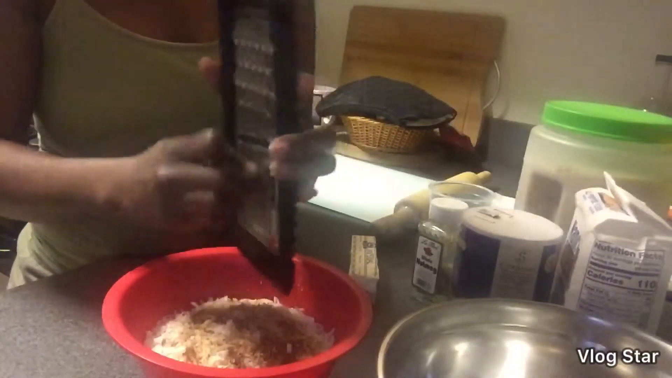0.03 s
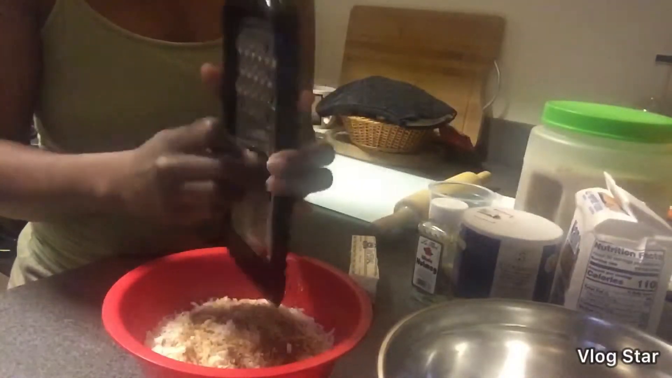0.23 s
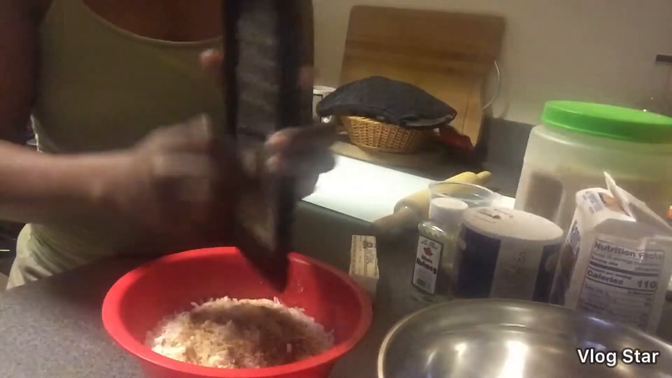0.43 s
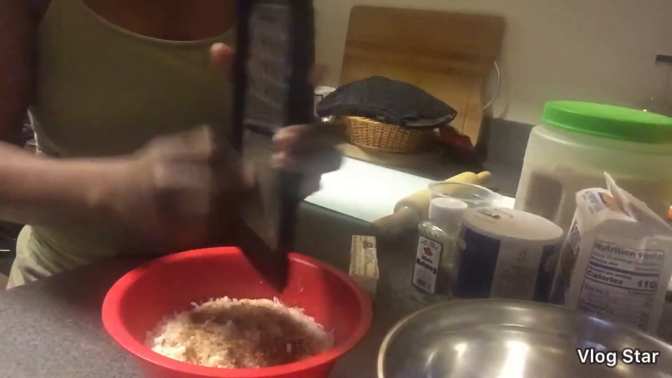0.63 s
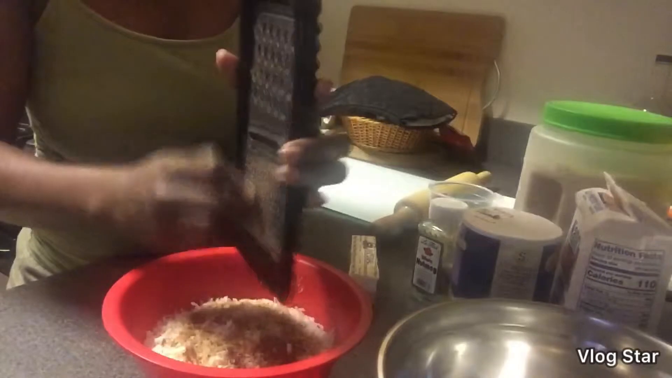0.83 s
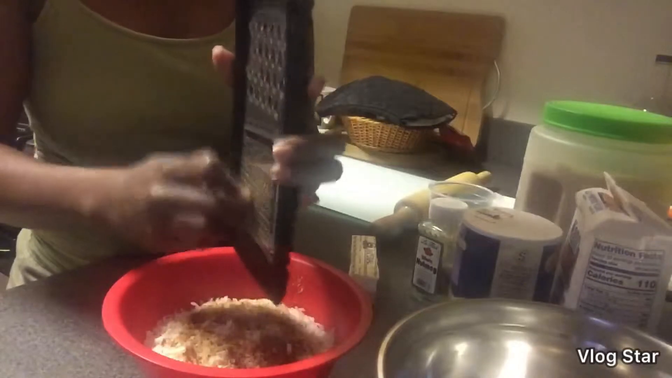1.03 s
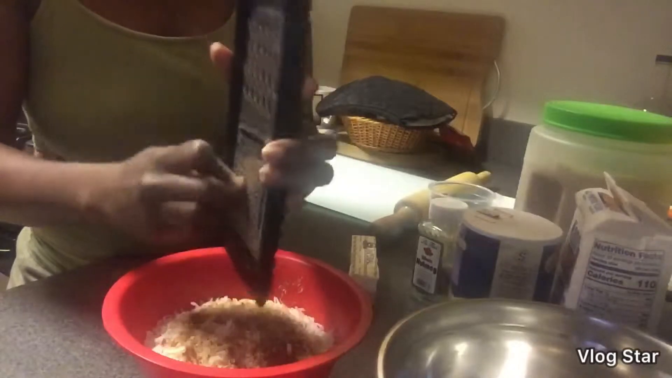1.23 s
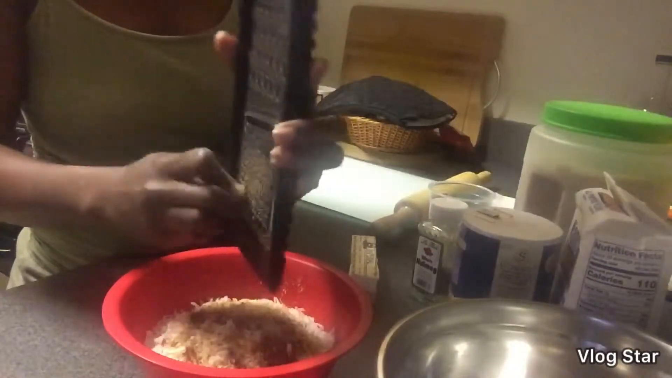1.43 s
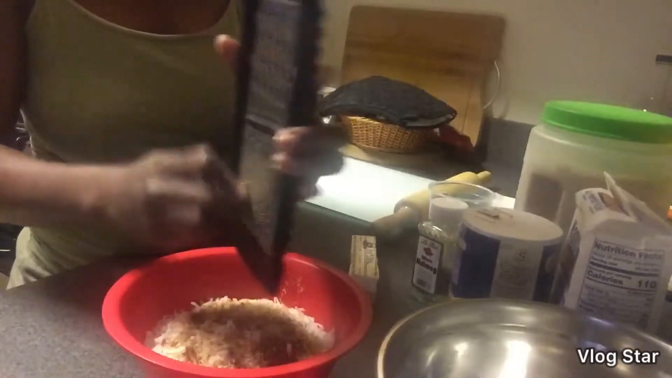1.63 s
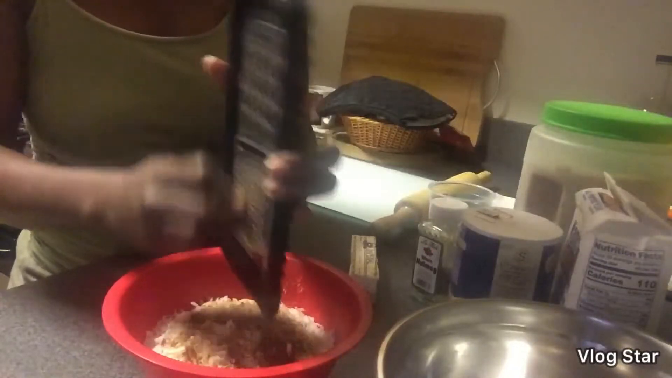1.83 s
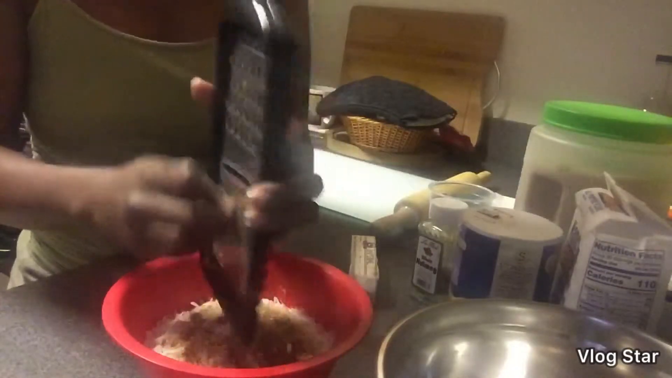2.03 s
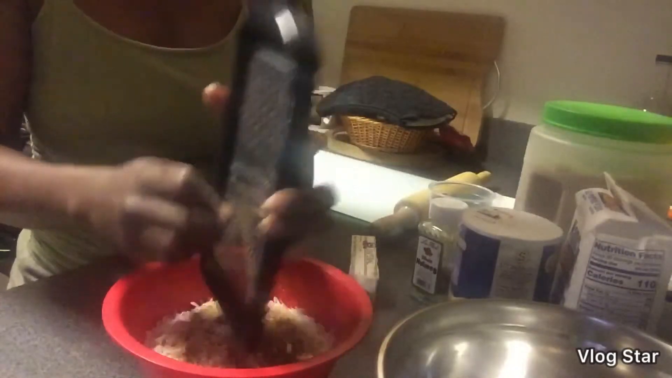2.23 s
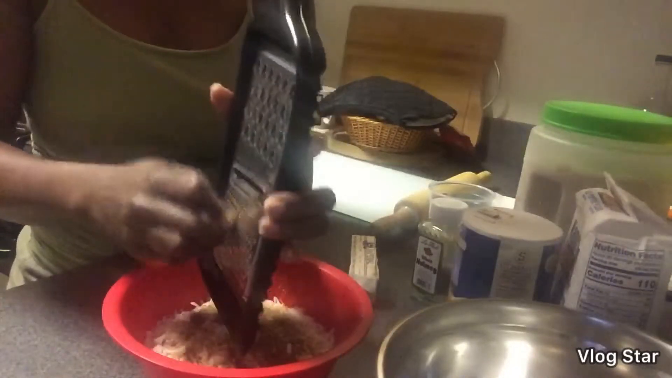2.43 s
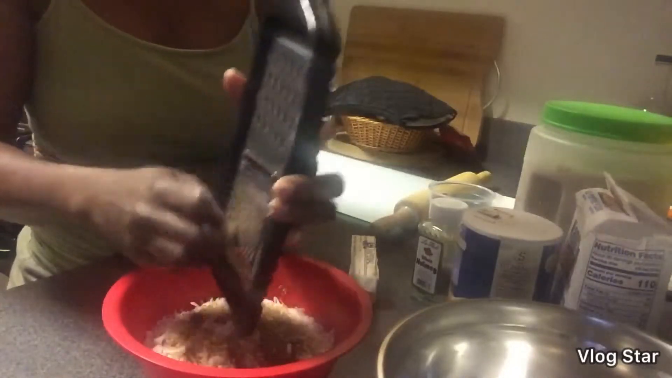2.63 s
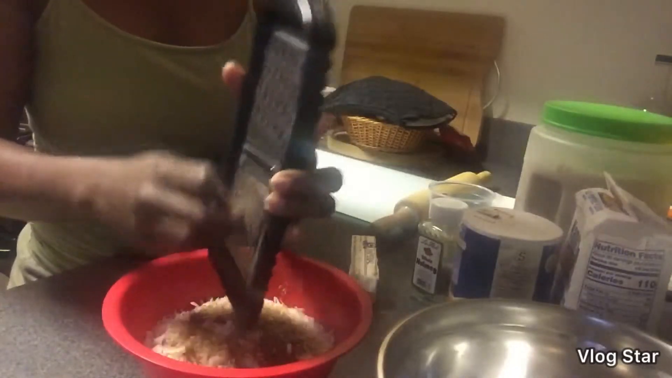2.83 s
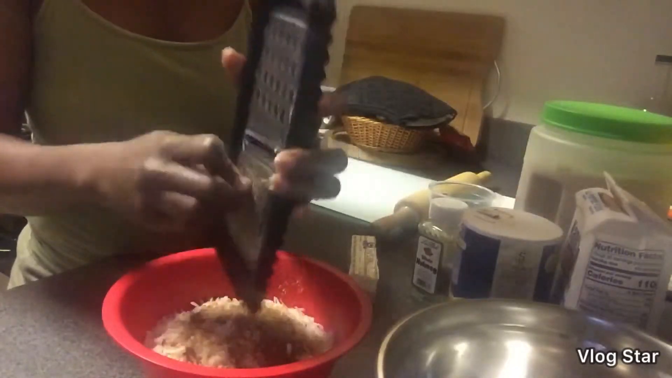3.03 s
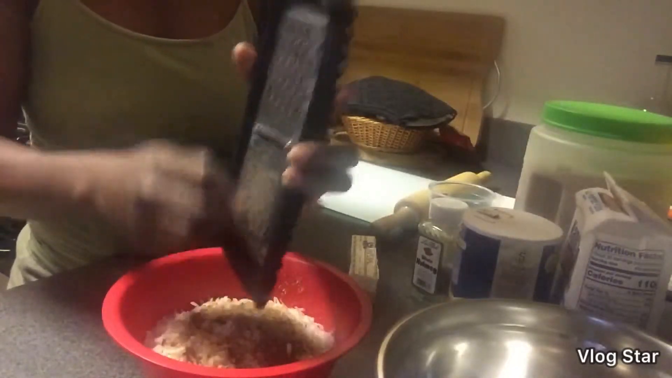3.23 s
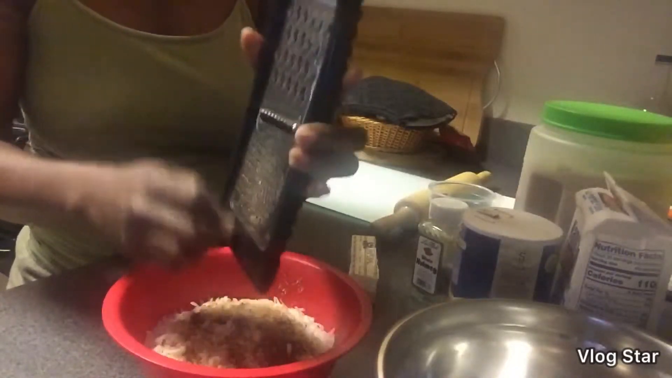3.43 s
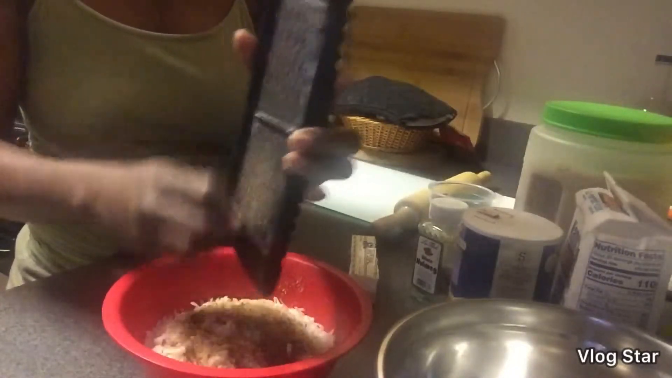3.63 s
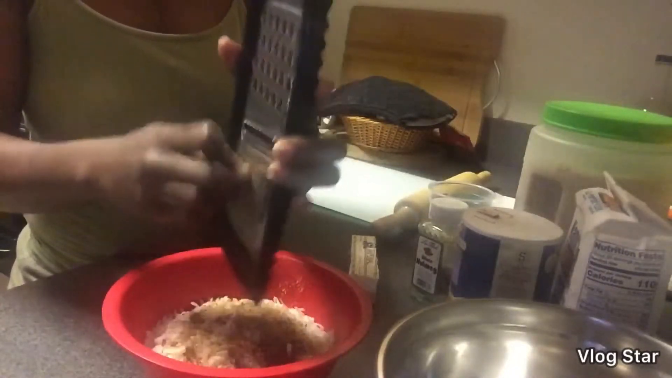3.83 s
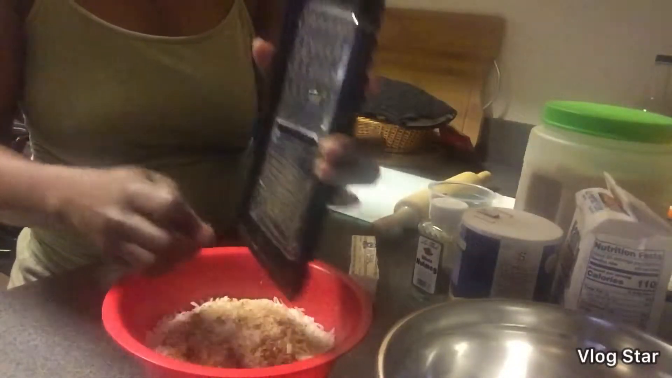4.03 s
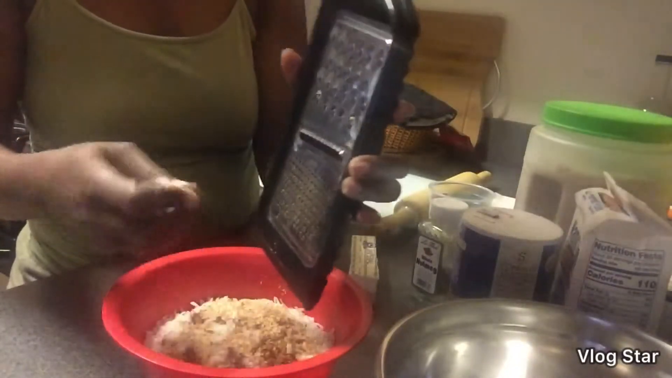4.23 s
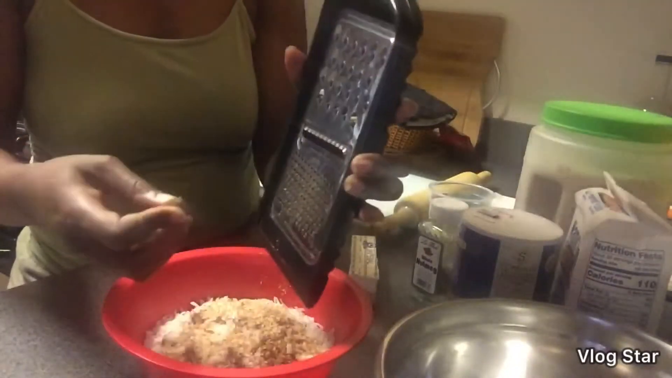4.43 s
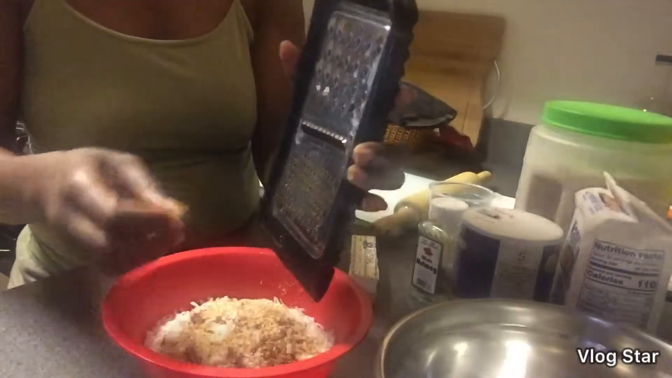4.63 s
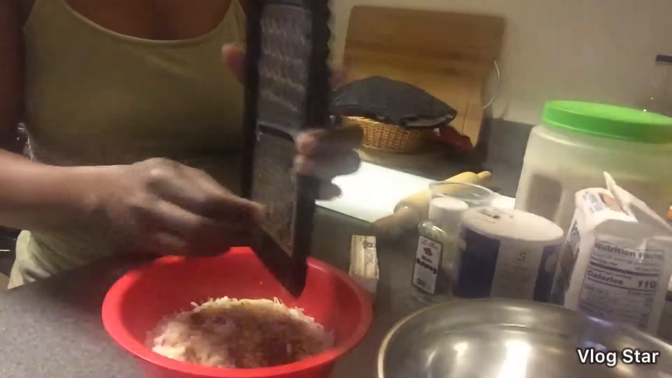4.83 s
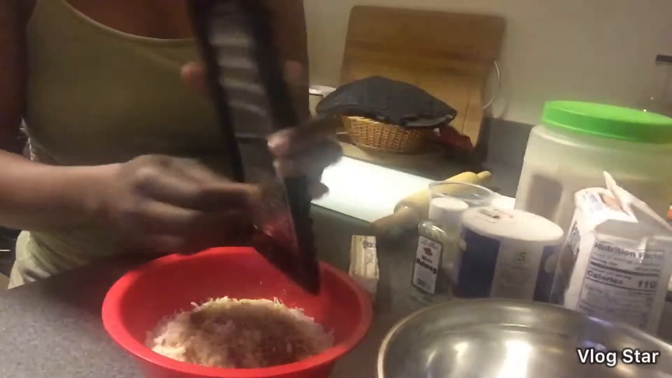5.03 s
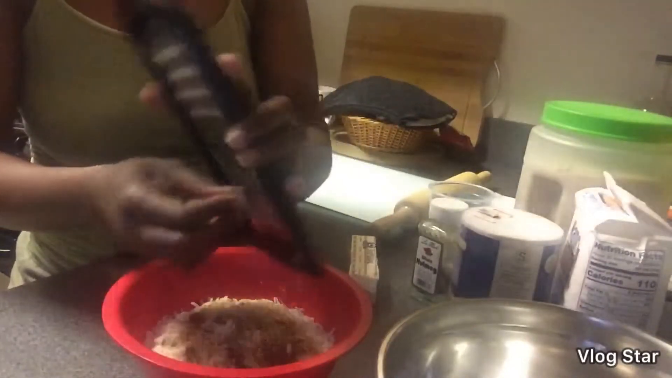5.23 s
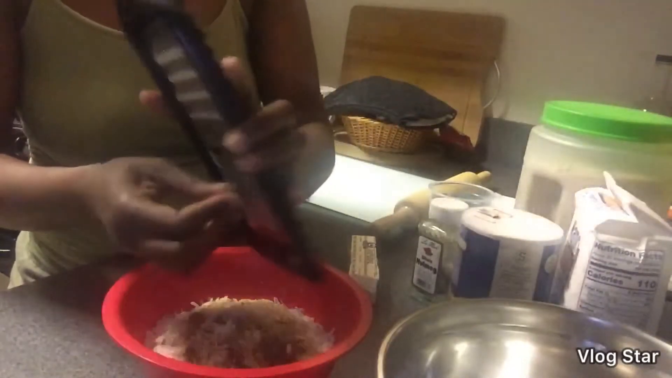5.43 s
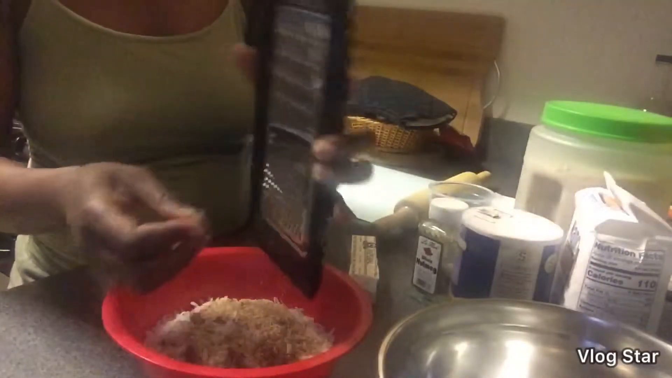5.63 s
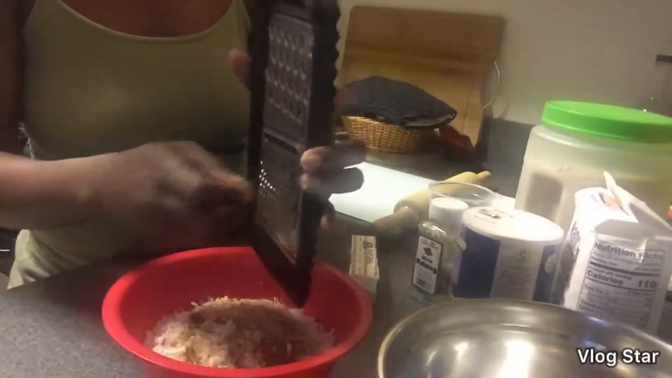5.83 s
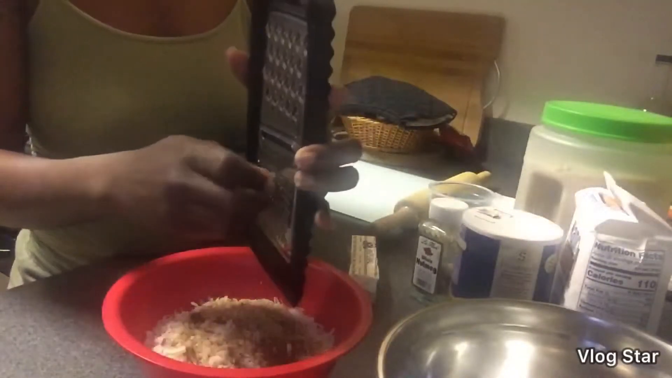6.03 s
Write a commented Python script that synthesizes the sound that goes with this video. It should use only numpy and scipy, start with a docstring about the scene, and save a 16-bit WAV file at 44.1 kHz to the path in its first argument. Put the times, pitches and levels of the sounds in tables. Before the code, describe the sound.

A whole nutmeg rasps in quick strokes over a hand-held steel grater, clacking on the plate, then four sharp taps in a small kitchen.

```python
"""A whole nutmeg is rubbed over a hand-held steel grater above a bowl, about four strokes a second.
The teeth chip it in dense tiny fractures that ring the plate; the nut clacks where it lands and where it catches.
After a pause four sharp taps knock the powder off, each with a thud of the frame.
The place is a small kitchen: short reflections, faint rumble and hiss, and a low, wavering appliance hum.
The grater is near the phone's microphone, so its direct sound outweighs the room."""
import sys
import numpy as np
from scipy import signal
from scipy.fft import rfft, irfft, next_fast_len
from scipy.io import wavfile
from scipy.ndimage import uniform_filter1d

SR = 44100
rng = np.random.default_rng(int(sys.argv[2]) if len(sys.argv) > 2 else 0)


def store_wav(level_fs):
    """Save 16-bit WAV to argv[1]."""
    pcm = np.round(np.clip(np.atleast_2d(level_fs), -1, 1) * 32767)
    wavfile.write(sys.argv[1], SR, pcm.T.astype(np.int16))


N = 269010
TIME = np.arange(N) / SR  # s
RING_TIME = TIME[:SR // 4]  # s, the length of one impact
TOP_HZ = 16000  # upper limit of the microphone and of the reflections


def undb(db):
    """Decibels to amplitude gain."""
    return 10 ** (np.asarray(db) / 20)


def unit(x):
    """Scale to an energy of one."""
    return x / np.sqrt(np.sum(x ** 2) + 1e-18)


def fade(t, t60):
    """Exponential decay of 60 dB in t60 seconds."""
    return np.exp(-np.log(1000) * t / t60)


def at(hz, table, axis=1):
    """Read a table's column on a log-frequency axis."""
    rows = np.array(table)
    return np.interp(np.log(np.maximum(hz, 1)), np.log(rows[:, 0]), rows[:, axis])


def colour(x, table):
    """Causal minimum-phase filter through (Hz, dB) points, made by folding the cepstrum."""
    size = 2 * next_fast_len(len(x))
    gain = undb(at(np.fft.rfftfreq(size, 1 / SR), table))
    cepstrum = irfft(np.log(gain))
    cepstrum[1:size // 2] *= 2
    cepstrum[size // 2 + 1:] = 0
    response = np.exp(rfft(cepstrum))
    return irfft(rfft(x, size) * response)[:len(x)]


def band(x, lo_hz, hi_hz, order=2):
    """Butterworth band-pass."""
    edges_hz = [lo_hz, min(hi_hz, SR / 2 - 100)]
    return signal.sosfilt(signal.butter(order, edges_hz, "band", fs=SR, output="sos"), x)


def shelf(x, hz, side, db):
    """Raise or lower the sound on one side ("low" or "high") of hz."""
    part = signal.sosfiltfilt(signal.butter(2, hz, side, fs=SR, output="sos"), x)
    return x + part * (undb(db) - 1)


def ring(x, response):
    """Play x through an impulse response."""
    return signal.fftconvolve(x, response)[:len(x)]


def walk(rate):
    """Random wander with a spread near one, through `rate` random points a second."""
    knots = rng.standard_normal(4096)
    return np.interp(TIME * rate, np.arange(len(knots)), knots)


def add(out, s, sound):
    """Mix a sound in at s seconds."""
    i = max(int(s * SR), 0)
    out[i:i + len(sound)] += sound[:N - i]


# Colour of the kitchen's air. Each row: frequency in Hz, relative level in dB.
AIR_COLOUR = [(20, -26), (55, -21.5), (140, -5.5), (200, -19), (400, -26.5), (1000, -32), (4000, -35),
              (12000, -43.5), (16000, -55)]
# Hum of an appliance. Each row: frequency in Hz, middle RMS level in dB, about which it wavers.
HUM_TONES = [(59, -74.5), (120, -78), (152, -71.5)]


def kitchen(air_db=-64.0, waver_db=8.0, phase_wander=.9):
    """Coloured noise gives soft rumble and hiss; sines wandering in level and phase (rad) give the hum."""
    noise = unit(colour(rng.standard_normal(N), AIR_COLOUR)) * np.sqrt(N)
    air = noise * undb(air_db + walk(3))
    hum = np.zeros(N)
    for hz, db in HUM_TONES:
        level = undb(db + waver_db * walk(4.5)) * np.sqrt(2)
        hum += level * np.sin(2 * np.pi * hz * TIME + phase_wander * walk(11.0))
    return air + hum


# Reverberation of the kitchen. Each row: frequency in Hz, decay time t60 in s, relative level in dB.
ROOM_DECAY = [(150, 1, -12.5), (600, 0.15, -8.5), (2540, 0.34, -13.5), (7000, 0.3, -13.5),
              (10000, 0.18, -13), (15000, 0.3, -16)]


def reflections(first_s=0.0072, count=10):
    """Diffuse response of walls and worktop: bands of noise, each dying away at its own rate."""
    t = TIME[:SR // 2]
    out = np.zeros(len(t))
    edges = np.geomspace(80, TOP_HZ, count + 1)
    for lo, hi in zip(edges, edges[1:]):
        hz = np.sqrt(lo * hi)
        noise = band(rng.standard_normal(len(t)), lo, hi, order=3)
        tail = noise * fade(t, at(hz, ROOM_DECAY)) * (t > first_s)
        bandwidth_gain = np.sqrt(2 * (hi - lo) / SR)
        out += unit(tail) * undb(at(hz, ROOM_DECAY, axis=2)) * bandwidth_gain
    return out


def room(sound, count=4, drift_hz=4):
    """The grater keeps moving, so the sound drifts between several patterns of reflections."""
    places = np.array([walk(drift_hz) for _ in range(count)])
    places /= np.sqrt(np.sum(places ** 2, axis=0))
    return sum(ring(sound * place, reflections()) for place in places)


# Modes of the grater. Each row: frequency in Hz, relative level in dB, decay time t60 in s.
GRATER_MODES = [(248, -27, .17), (434, -21, .09), (657, -26, .05), (1006, -28, .15), (1391, -21, .13),
                (1486, -24, .17), (1888, -13, .07), (2444, -13.5, .06), (2600, -11, .055),
                (2982, -14.5, .08), (3205, -12, .055), (3362, -8.5, .085), (3733, -16, .03),
                (3994, -25, .18), (4385, -24, .1), (5025, -16, .025), (6008, -23, .05), (7320, -14.5, .025),
                (8580, -22, .04), (11310, -24, .03)]


def clear_modes():
    """The free ring of each mode of the grater, a decaying sine, one row a mode."""
    rings = []
    for hz, db, t60 in GRATER_MODES:
        decaying_sine = np.sin(2 * np.pi * hz * RING_TIME) * fade(RING_TIME, t60)
        rings.append(undb(db) * unit(decaying_sine))
    return np.array(rings)


def dense(t60, count=7):
    """Countless overlapping modes: a noise burst that dies away, evened out in spectrum."""
    burst = rng.standard_normal(len(RING_TIME)) * fade(RING_TIME, t60)
    spectrum = rfft(burst)
    power = uniform_filter1d(np.abs(spectrum) ** 2, len(spectrum) // count ** 2)
    even = irfft(spectrum / np.sqrt(power), len(burst))
    return unit(even * fade(RING_TIME, 10 * t60))


def grater(modes, spectrum, t60, modes_db, scatter_db=1.5):
    """Response of the plate: a short clatter and its clear modes, whose mix depends on the spot that is hit."""
    signs = rng.choice([-1, 1], len(modes))
    weights = undb(scatter_db * rng.standard_normal(len(modes))) * signs
    clatter = colour(dense(t60), spectrum)
    return unit(clatter + undb(modes_db) * (weights @ modes))


def blow(hit, tilt, rebound_s, rebound, contact_s):
    """A contact builds up and rebounds at once; hardness and place tilt the colour by (Hz, dB) points."""
    hit = hit * (1 - np.exp(-RING_TIME / contact_s))
    again = np.interp(RING_TIME - rebound_s, RING_TIME, hit, left=0)
    return unit(colour(hit + rebound * again, tilt))


# Colour of the clatter of a tap. Each row: frequency in Hz, relative level in dB.
TAP_COLOUR = [(100, -30.5), (280, -11), (600, -6.5), (850, -18.5), (1200, -9.5), (2500, 2), (3400, -1),
              (5600, -1.5), (7400, -2.5), (9500, -10.5), (12000, -12.5), (16000, -22.5)]
# Taps that shake the powder off. Each row: start in seconds, relative level in dB, treble in dB,
# presence in dB, bass in dB, relative thud of the frame in dB, ring of the modes in dB, clatter t60 in s.
TAP_EVENTS = [(4.91, -15.5, 3, 4, -7.5, -48, -9.5, 0.035), (5.094, -16.5, -2.5, 4, -9, -46, -10, 0.022),
              (5.304, -20, -5.5, -3, -6.5, -38.5, -9, 0.051),
              (5.506, -17.5, -4.5, -2, -15, -43, -7.5, 0.058)]


def taps(modes, thud_hz=122, thud_t60=0.085):
    """Sharp taps ring the plate; the frame thuds in the hand, a decaying low sine."""
    out = np.zeros(N)
    thud = unit(np.sin(2 * np.pi * thud_hz * RING_TIME) * fade(RING_TIME, thud_t60))
    for s, db, treble_db, presence_db, bass_db, thud_db, ring_db, t60 in TAP_EVENTS:
        tilt = [(450, bass_db), (1400, 0), (3300, 0), (5000, presence_db), (10000, treble_db)]
        hit = grater(modes, TAP_COLOUR, t60=t60, modes_db=ring_db)
        tap = blow(hit, tilt, rebound_s=0.003, rebound=0.21, contact_s=.0007)
        add(out, s, undb(db + 22.5) * tap)
        add(out, s, undb(thud_db + 26.5) * thud)
    return out


# Colour of the clatter of a knock. Each row: frequency in Hz, relative level in dB.
KNOCK_COLOUR = [(60, -29.5), (130, -12.5), (300, -14.5), (1000, -11.5), (2000, 5.5), (3200, 4.5), (4500, 2),
                (7500, 2.5), (9500, -6), (16000, -14)]
# The nut lands on the plate or snags on a tooth. Each row: start in seconds, relative level in dB,
# treble in dB, bass in dB.
KNOCK_EVENTS = [(0.036, -24, -0.5, 11), (0.128, -14.5, -8, 6), (0.172, -12.5, -0.5, 0),
                (0.247, -15.5, -3, 1), (0.35, -14.5, -11.5, -1), (0.472, -17, 4.5, -3),
                (0.523, -15.5, 1.5, 7.5), (0.576, -11.5, -3, -6), (0.959, -16, -1.5, -3.5),
                (1.012, -13, 9.5, 3), (1.134, -20.5, 1, -5), (1.259, -16, 3, 7.5),
                (1.435, -21.5, 3.5, -5.5), (1.648, -22.5, 4, 16), (1.847, -17, 3, -3.5),
                (2.084, -19, -3, -6.5), (2.207, -27, -16.5, 1.5), (2.338, -21, -20, 6.5),
                (2.376, -15, -0.5, 0), (2.399, -15, 7, 4.5), (2.425, -12.5, 6, 7.5), (2.569, -24, -1, 8),
                (2.616, -27.5, -7, -5), (2.625, -13.5, -0.5, -11), (2.687, -15.5, -10.5, -2.5),
                (2.709, -16, 3.5, 9), (2.837, -34, -19, 3.5), (2.86, -28, -0.5, -3), (2.97, -15.5, -2, -2),
                (3.089, -22.5, 2, -1), (3.216, -18.5, -10, 6), (3.355, -17, 1, 3), (3.468, -15, -6, -1),
                (3.495, -11.5, -0.5, 4), (3.641, -20, -19, 8.5), (3.741, -27.5, -5.5, 11),
                (3.767, -16, -3, 4), (3.918, -18.5, -7, 5), (4.018, -13, 3.5, -1.5), (4.04, -11, -5, 3.5)]


def knocks(modes, knock_db=15.0):
    """The nut clacks against the steel, each contact with a quick rebound that rings the plate again."""
    out = np.zeros(N)
    for s, db, treble_db, bass_db in KNOCK_EVENTS:
        tilt = [(700, bass_db), (1800, 0.014), (4000, 0.0013), (10000, treble_db)]
        hit = grater(modes, KNOCK_COLOUR, t60=0.04, modes_db=-9)
        rebound_s = rng.uniform(0.0006, 0.0036)
        clack = blow(hit, tilt, rebound_s=rebound_s, rebound=0.49, contact_s=0.00038)
        add(out, s, undb(db + knock_db) * clack)
    return out


def chips(tooth_hz, tooth_db, chips_per_s, chip_db):
    """Teeth bite and let go irregularly; each bite is a shower of tiny fractures, a few of them large."""
    sizes = undb(chip_db * np.minimum(rng.exponential(size=N), 5)) * rng.choice([-1, 1], N)
    breaks = rng.random(N) < chips_per_s / SR
    bites = undb(tooth_db * walk(2 * tooth_hz))
    train = sizes * breaks * bites
    # the hand keeps the mean pressure while single bites vary
    return train / np.sqrt(uniform_filter1d(train ** 2, SR // 50) + 1e-9)


# level lost at the start and end of a pass (dB), and the power of that fall-off
ENTRY_DB, EXIT_DB, SWELL_POWER = -7.5, -21.5, 2.32


def swell(t, rise_s, fall_s):
    """Level in dB along one pass: a rounded arch, as the hand speeds up and slows down."""
    early = np.clip(1 - t / rise_s, 0, 1)
    late = np.clip((t - rise_s) / fall_s, 0, 1)
    return ENTRY_DB * early ** SWELL_POWER + EXIT_DB * late ** SWELL_POWER


# treble gained for each dB above an ordinary stroke (dB per dB), and that stroke's level (dB)
BRIGHTENING, ORDINARY_DB = .15, -27.5
# the nut brushes the teeth just before it bites: length (s) and level below the bite (dB)
BRUSH_S, BRUSH_DB = .01, -5.5
# Colour of the rasp. Each row: frequency in Hz, relative level in dB.
RASP_COLOUR = [(60, -17.5), (130, -2.5), (320, -23), (480, -12), (700, -6), (950, -10), (1400, 1.5),
               (2200, 4.5), (3300, 2.5), (4500, 2), (7500, 2.5), (9500, -4.5), (12500, -6), (16000, -15.5)]


def scrape(modes, fractures, s, rise_s, fall_s, db, modes_db, edge_s=0.0018, count=3):
    """One pass carries the chipping across a few spots of the plate, so its colour shifts; pressure brightens it."""
    length = rise_s + fall_s
    t = TIME[:int((BRUSH_S + length) * SR)] - BRUSH_S  # zero at the bite
    level_db = db + swell(t, rise_s, fall_s)
    brush = undb(BRUSH_DB) * (1 + t / BRUSH_S) * (t < edge_s)
    bite = np.clip(np.minimum(t, length - t) / edge_s, 0, 1)
    contact = np.maximum(brush, bite)
    drive = fractures[max(int(s * SR), 0):][:len(t)] * contact * undb(level_db)
    drive = shelf(drive, 5000, "high", BRIGHTENING * (level_db - ORDINARY_DB))
    place = np.linspace(0, count - 1, len(t))
    out = 0
    for spot in range(count):
        near = np.sqrt(np.maximum(1 - np.abs(place - spot), 0))
        plate = grater(modes, RASP_COLOUR, t60=0.012, modes_db=modes_db)
        out = out + signal.fftconvolve(drive * near, plate)
    return out


def tone(x, body_db, treble_db):
    """Balance of one pass: body below 1200 Hz and treble above 7500 Hz."""
    return shelf(shelf(x, 1200, "low", body_db), 7500, "high", treble_db)


# Light returns, the nut skating back up. Each row: start of the bite in seconds, rise in s, fall in s,
# relative level in dB.
RETURN_PASSES = [(0.0, 0.04, 0.062, -32), (0.2, 0.045, 0.0078, -44.5), (0.3, 0.034, .03, -46),
                 (0.442, 0.053, 0.048, -33), (0.68, 0.033, 0.04, -33.5), (0.895, 0.029, 0.077, -35.5),
                 (1.124, 0.053, 0.026, -36), (1.358, 0.02, 0.056, -41), (1.544, 0.06, 0.02, -30.5),
                 (1.75, 0.032, 0.018, -41), (1.985, 0.021, 0.022, -44.5), (2.492, 0.023, 0.013, -39.5)]
# Cutting strokes down the teeth. Each row: start of the bite in seconds, rise in s, fall in s,
# relative level in dB, body in dB, treble in dB.
CUTTING_STROKES = [(0.12, 0.043, 0.052, -27, 1.5, 2.5), (0.256, 0.018, .04, -20, 2, -1),
                   (0.345, 0.027, .05, -20.5, -3, 2), (0.569, 0.017, 0.064, -20.5, -5.5, 3.5),
                   (0.778, 0.052, 0.046, -25.5, -4.5, 4), (1.01, 0.021, 0.064, -23, -1, 3),
                   (1.212, 0.03, .046, -27.5, 2, 4), (1.433, .033, 0.052, -25, -3, 2.5),
                   (1.643, 0.031, 0.067, -23, 2, 4.5), (1.878, 0.045, 0.044, -22.5, -3, 2),
                   (2.108, 0.024, 0.081, -23.5, -1.5, 4), (2.371, 0.049, .05, -34.5, 4.5, -4),
                   (2.625, 0.029, 0.08, -22.5, 3.5, 0.5), (2.874, 0.045, 0.05, -20.5, -2.5, -3),
                   (3.126, 0.046, 0.05, -25.5, -6, 3), (3.387, 0.046, 0.035, -24.5, -3.5, 2.5),
                   (3.664, 0.039, 0.045, -27, -5, 2.5), (3.939, .033, 0.054, -22.5, -3.5, 3)]


def rasp(modes, cut_db=-1.26, return_db=-1.04):
    """Cutting strokes chip densely; on the lighter way back the nut skips over the teeth with fewer chips."""
    out = np.zeros(N)
    cutting = chips(tooth_hz=150.7, tooth_db=2.5, chips_per_s=5000, chip_db=3.5)
    skipping = chips(tooth_hz=70, tooth_db=0.5, chips_per_s=3000, chip_db=3.5)
    for s, rise_s, fall_s, db, body_db, treble_db in CUTTING_STROKES:
        stroke = scrape(modes, cutting, s, rise_s, fall_s, db + cut_db, modes_db=-4.5)
        add(out, s - BRUSH_S, tone(stroke, body_db, treble_db))
    for s, rise_s, fall_s, db in RETURN_PASSES:
        stroke = scrape(modes, skipping, s, rise_s, fall_s, db + return_db, modes_db=-4.5)
        add(out, s - BRUSH_S, tone(stroke, body_db=-1.0, treble_db=1.0))
    return out


def scene():
    """Grating, knocks and taps near the microphone, with the room and the kitchen behind them."""
    modes = clear_modes()
    direct = rasp(modes) + knocks(modes) + taps(modes)
    return (direct + room(direct) + kitchen())[None]


def record(dry, low_cut_hz=42):
    """The phone's microphone drops the deepest bass and cuts the top steeply."""
    thin = signal.sosfilt(signal.butter(3, low_cut_hz, "high", fs=SR, output="sos"), dry)
    return signal.sosfilt(signal.ellip(10, .2, 70, TOP_HZ, fs=SR, output="sos"), thin)


dry = scene()
out = record(dry)
store_wav(out)
```